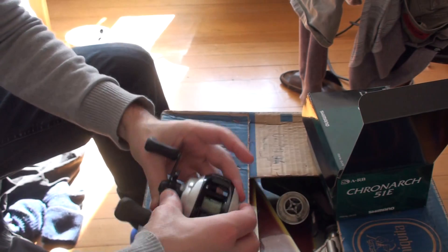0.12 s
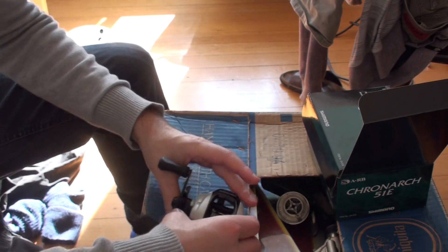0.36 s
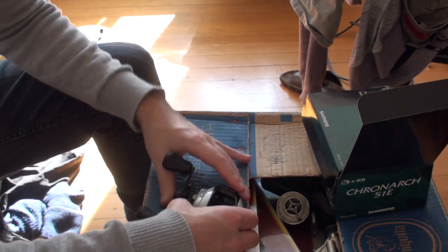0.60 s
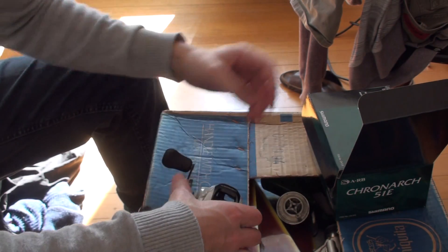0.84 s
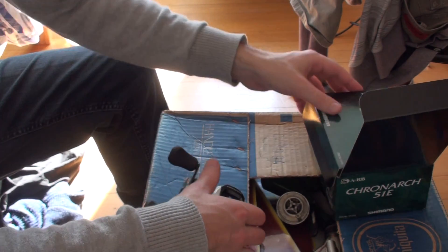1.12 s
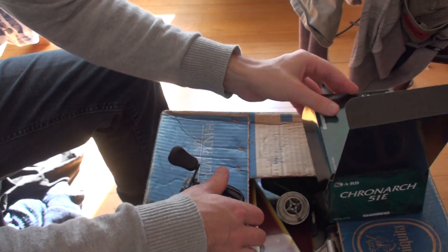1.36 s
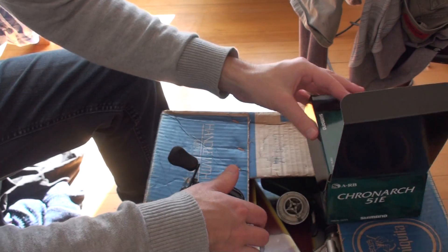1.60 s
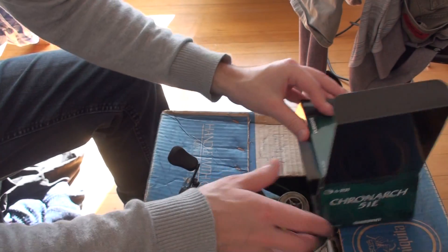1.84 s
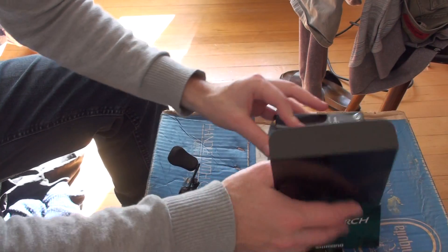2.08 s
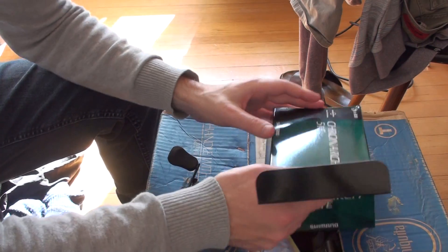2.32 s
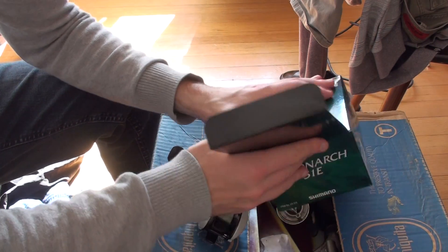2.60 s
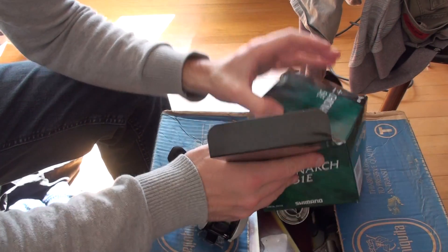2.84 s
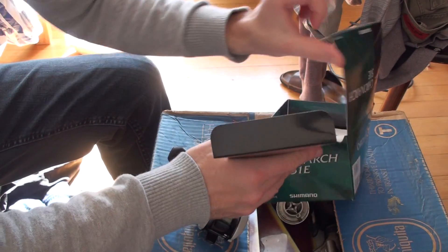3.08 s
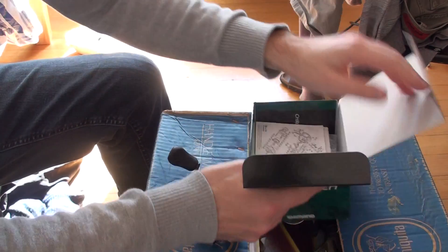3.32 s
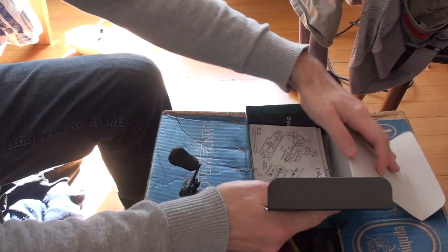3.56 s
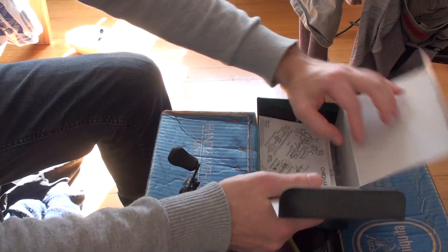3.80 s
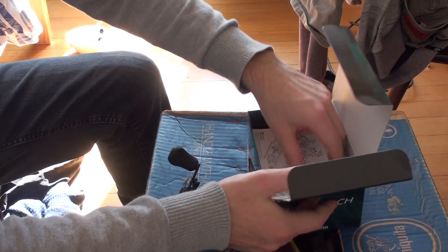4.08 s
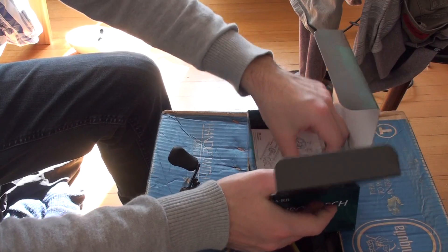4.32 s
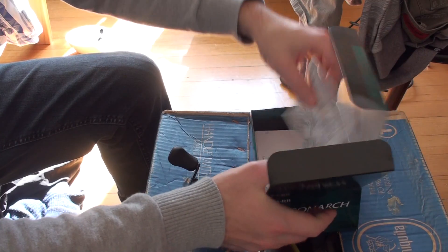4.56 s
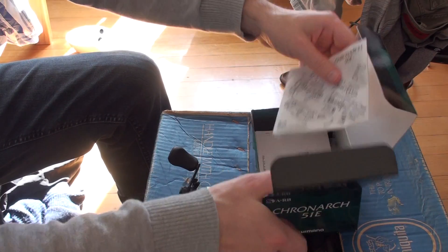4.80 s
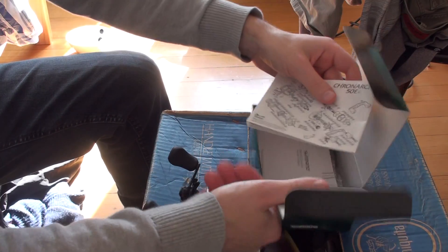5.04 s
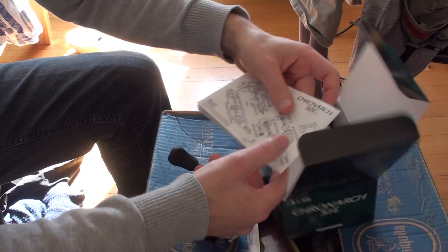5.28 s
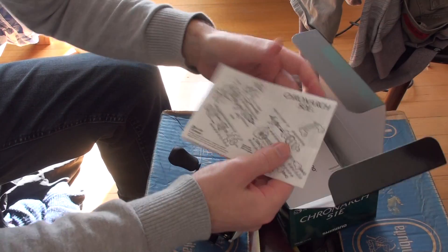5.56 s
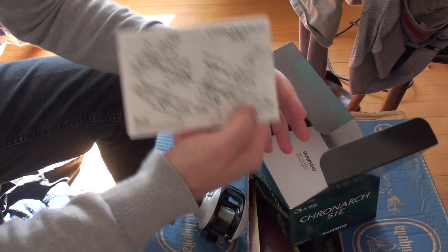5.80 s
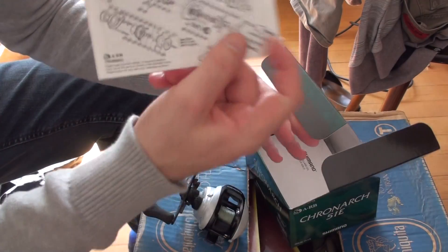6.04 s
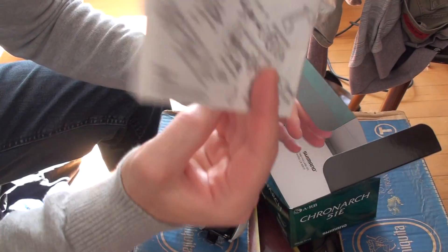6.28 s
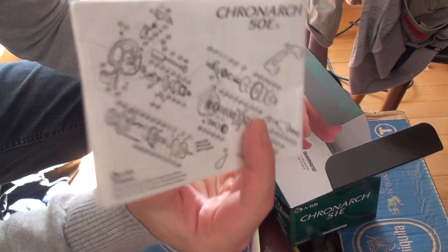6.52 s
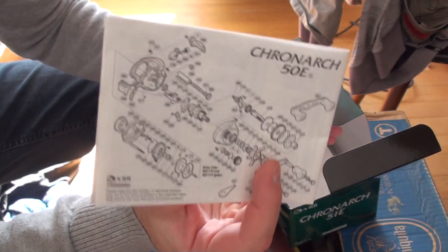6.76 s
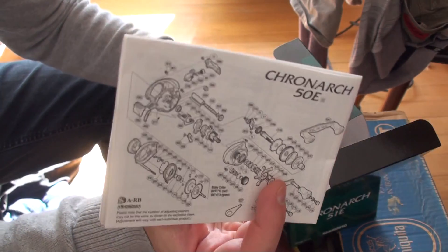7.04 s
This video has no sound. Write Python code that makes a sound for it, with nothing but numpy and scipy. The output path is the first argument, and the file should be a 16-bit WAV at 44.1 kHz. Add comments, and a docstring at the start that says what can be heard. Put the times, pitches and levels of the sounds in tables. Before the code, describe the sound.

Steady soft room air and a low rumble run throughout. A very faint metallic rattle comes at once; at 0.6 s a dull bump with a cardy knock, and at 0.75 s a brighter small metal rattle with a short scrape. From 1 to 3 s hands move a cardboard box: light scrapes, smooth fingertip hiss, small hollow knocks, a stronger drag near 2.1 s and another near 2.65 s. At 3.2 s a crisp bright snap and scrape, then knocks, and the loudest hollow thump at 3.6 s. Another knock lands at 4.13 s, a sharp scratch at 4.29 s, a tiny rising card squeak at 4.58 s amid paper rustle, and a higher clack at 4.97 s. Small scrapes and ticks continue to 5.5 s, then thin to faint hisses and isolated ticks. Soft, deep footfalls push the wooden floor around 5.35, 6.0, 6.55 and 7.1 s. Close stereo microphones, short room tail.

```python
"""Room air and a low rumble, and at once the faint rattle of a small metal reel set down close by.
Hands lift, turn and open a cardboard box and draw a folded sheet from it: noise drives the ringing panels
for scrapes and is filtered for rustle and smooth hiss; scattered contacts make knocks, snaps and ticks.
A card edge squeaks once, and near the end someone's steps push the wooden floor. The camera's
microphone pair is close to the hands; a diffuse tail gives the room."""
import sys
import numpy as np
from scipy import signal
from scipy.fft import rfft, irfft, next_fast_len
from scipy.io import wavfile
from scipy.ndimage import uniform_filter1d

SR = 44100
rng = np.random.default_rng(int(sys.argv[2]) if len(sys.argv) > 2 else 0)


def volts(x):
    """Linear amplitude factor 10**(x/20) for a level x in dB, scalar or array-like."""
    e = np.asarray(x, float) / 20
    return 10 ** e


def generate_wav(sig):
    """Save sig (samples, or channels by samples) to the path in sys.argv[1] as 16-bit PCM at SR."""
    pcm = np.round(np.clip(np.atleast_2d(sig).T, -1, 1) * 32767).astype(np.int16)
    wavfile.write(sys.argv[1], SR, pcm)


N = 315443
T = np.arange(N) / SR  # seconds

# Spectrum of the room's air. Each row: frequency in Hz, relative density in dB.
AIR_SPECTRUM = [(35, -25), (60, -6), (124, -10), (393, -7), (497, -8), (629, -9), (916, -8.5), (1210, -6),
                (1650, -12), (2090, -14), (10800, -33), (13000, -25), (16500, -28)]
# Low rumble of the room, set by hand at a few times. Each row: time in seconds, rms level of the mid in dB.
RUMBLE_LEVEL = [(0.0, -71), (0.3, -79), (0.63, -65), (0.88, -71), (1.05, -66), (1.2, -75), (2.39, -69),
                (2.59, -68), (2.89, -72), (3.13, -70), (4.0, -67), (4.56, -76), (5.04, -67.5),
                (6.11, -70.5), (7.15, -63.5)]
# Spread of the microphone pair. Each row: frequency in Hz, gain given to the side signal in dB.
PAIR_WIDTH = [(30, -24), (110, -18), (400, -11), (1300, -10.5), (4400, -8.5), (8000, -8), (11000, -5),
              (12500, -35)]
# Near sources a little to the right. Each row: frequency in Hz, right over left in dB.
RIGHT_LEAN = [(500, 0), (1500, 1.5), (9000, 2), (13000, 1.5)]
# Decay of the room. Each row: band centre in Hz, t60 in seconds.
ROOM_DECAY = [(150, 0.26), (400, 0.23), (1000, 0.28), (2500, 0.31), (6000, 0.35), (13000, 0.25)]

# Strokes that drag on card. Each row: peak time in seconds, scrape level in dB, rise in seconds,
# fall in seconds, paper rustle against the scrape in dB.
SCRAPE_STROKES = [(.1, -73, 0.0076, 0.082, 5), (.66, -67, .15, .04, -3), (.756, -46.5, 0.0073, 0.021, -26),
                  (1.056, -54.5, 0.0047, 0.019, -17), (1.17, -65.5, 0.088, 0.22, -13),
                  (1.4, -67.5, 0.41, .12, -4.5), (1.7, -65.5, 0.11, 0.088, -6.5),
                  (1.88, -60.5, .07, 0.078, -11), (1.984, -64.5, 0.022, .1, -19),
                  (2.108, -51.5, .1, 0.019, -9.5), (2.172, -56.5, .02, 0.1, -9),
                  (2.434, -67, 0.32, 0.26, -4), (2.568, -65, 0.15, .2, -15),
                  (2.666, -51.5, 0.21, 0.021, -10), (2.798, -62.5, 0.15, 0.22, -4),
                  (3.02, -61.5, 0.1, 0.31, -8), (3.17, -67, 0.35, .1, -20), (3.23, -43, .03, 0.094, -8),
                  (3.36, -51, 0.14, 0.15, -7), (3.5, -56.5, 0.29, 0.015, -8), (3.528, -59, 0.016, 0.2, -15),
                  (3.72, -57, .3, 0.25, -12), (3.81, -61.5, 0.23, 0.07, -6),
                  (3.938, -47.5, .025, 0.013, -13), (3.978, -59.5, .03, 0.083, -7.5),
                  (4.22, -55, 0.094, 0.033, -4), (4.288, -42.5, 0.016, 0.0038, -15),
                  (4.418, -53, 0.11, 0.1, -6.5), (4.588, -64, .02, 0.041, -9),
                  (4.654, -59, 0.0052, 0.11, 2), (4.892, -65.5, 0.29, 0.042, 1),
                  (5.05, -53.5, 0.073, 0.029, -13), (5.08, -62.5, .05, 0.13, 0.5),
                  (5.272, -56.5, 0.075, 0.035, -11), (5.39, -57.5, 0.49, .1, -15),
                  (5.438, -56, 0.084, 0.089, -8), (5.6, -68, .1, 0.046, -13),
                  (5.852, -67.5, 0.22, .02, -17), (6.0, -68, .1, 0.38, -8), (6.21, -81, .02, 0.15, -3),
                  (6.29, -70, 0.044, .015, -1), (6.46, -66.5, 0.049, .09, -17),
                  (6.62, -68, 0.015, 0.06, -0.5), (7.05, -72.5, 0.69, .02, -7.5),
                  (7.14, -67, 0.061, .1, -9)]
# Smooth hisses: fingertips sliding over smooth faces, but at .764 s the bright rattle of the metal reel.
# Each row: peak time in seconds, hiss level in dB, rise in seconds, fall in seconds,
# finest hiss against the hiss in dB.
HISS_STROKES = [(.7, -66.5, 0.11, 0.16, 1), (.764, -55.5, 0.029, 0.037, -3),
                (1.174, -71.5, 0.045, 0.12, -9), (1.47, -69.5, 0.11, .09, -11),
                (1.674, -69.5, 0.1, 0.12, -11), (1.792, -69.5, .2, 0.13, -11), (1.9, -64.5, 0.043, .2, -12),
                (1.962, -59, 0.1, 0.28, -7.5), (2.12, -66.5, .3, 0.33, -6.5), (2.568, -69, 0.32, .4, -8),
                (2.77, -65, .3, 0.051, -12), (2.908, -65, 0.039, 0.13, -14), (3.08, -70.5, .05, 0.21, -15),
                (3.36, -58, 0.11, 0.092, -21), (3.515, -59.5, 0.12, 0.13, -6.5),
                (3.81, -66, 0.11, 0.43, -6), (3.938, -60.5, .05, .04, -12), (3.978, -57.5, .03, 0.05, -13),
                (4.342, -65.5, 0.063, .5, -5), (4.432, -59.5, 0.02, 0.32, -9),
                (4.588, -58.5, 0.071, 0.031, -8), (4.654, -62.5, .01, 0.16, -22),
                (4.892, -55, 0.095, 0.029, -8), (5.05, -62.5, 0.23, 0.21, -18),
                (5.292, -58.5, 0.11, 0.13, -5.5), (5.438, -66.5, .055, 0.18, -14),
                (5.536, -66.5, 0.15, 0.084, -4.5), (5.702, -67, 0.12, 0.05, -6.5),
                (5.772, -64.5, 0.022, 0.089, -3.5), (5.946, -63, 0.093, .08, -4.5),
                (6.11, -67.5, .004, 0.16, -2), (6.2, -64, 0.071, 0.078, -8), (6.4, -68.5, .06, 0.078, -21),
                (6.46, -69.5, .1, 0.05, -10), (6.622, -61.5, 0.0066, 0.033, -9)]
# Hands never quite still. In order: resting scrape, rustle, hiss and finest hiss, each in dB.
REST_LEVELS = (-96, -81, -79.5, -85)
# Spectrum of rustling paper. Each row: frequency in Hz, relative density in dB.
RUSTLE_SPECTRUM = [(800, -29), (1500, 8), (2500, 4.5), (4000, -2), (6000, -7.5), (10000, -13)]
# Spectrum of the hiss. Each row: frequency in Hz, relative density in dB.
HISS_SPECTRUM = [(3000, -1), (5000, 1), (7000, 1.5), (9000, -2), (12000, -34)]
# Spectrum of the finest hiss. Each row: frequency in Hz, relative density in dB.
FINE_SPECTRUM = [(7000, -17), (10000, 1), (12000, 1), (16500, -12)]

# Rattles of the reel. Each row: start in seconds, peak level in dB.
REEL_RATTLES = [(.016, -58), (.760, -43)]
# Ringing metal of the reel. Each row: frequency in Hz, relative level in dB, t60 in seconds.
REEL_MODES = [(2400, -5, .02), (4064, -7, .03), (4700, -7, .05), (5250, -4, .05), (5420, -4, .07),
              (5600, -3, .06), (5780, -6, .04), (6000, -8, .03), (7004, -12, .02), (8300, -11, .03),
              (9700, -9, .05), (9830, -4, .075), (11420, -10, .03)]
# Short bright ticks, several of them the sharp top of a knock at the same moment.
# Each row: start in seconds, peak level in dB, centre in Hz, decay in milliseconds.
TICKS = [(.1118, -40, 2980, 2.9), (.745, -45, 4860, 1.7), (.745, -42, 11600, 4), (1.973, -46, 8000, 2.2),
         (2.066, -46, 8050, 3), (3.192, -21, 6960, 5), (3.204, -31.5, 10600, 1.9),
         (3.334, -32.5, 7000, 3.6), (3.446, -47, 4130, 2.6), (3.462, -41, 6000, 2.5), (3.509, -46, 8000, 3),
         (3.597, -32, 3640, 2.5), (3.791, -53, 3440, 1.1), (4.286, -37, 3240, 1.3),
         (4.406, -38.5, 4650, 1.4), (4.427, -55, 8000, 3), (4.579, -42, 7960, 4), (5.104, -47, 7000, 1.5),
         (5.291, -38, 11000, 4), (5.308, -39, 8200, 2), (5.358, -49, 8000, 3.5), (6.111, -43.5, 9940, 9),
         (6.211, -48, 11000, 4.6), (6.472, -43.5, 3600, 1.5), (6.472, -41.5, 6000, 1.2),
         (6.526, -43.5, 1590, 0.71), (6.621, -48.5, 4570, 8)]
# Knocks on card. Each row: start in seconds, body peak in dB, centre of the struck panel in Hz,
# gain of the far panels in dB, edge crack peak in dB.
KNOCKS = [(0.486, -46.5, 289, -18, -56), (0.5709, -47, 310, -17, -62), (0.6053, -30.5, 360, -2, -39.5),
          (0.7281, -44.5, 326, -12, -49.5), (0.7551, -41.5, 464, -23, -45), (1.0562, -48, 517, 0, -67),
          (1.1132, -50, 318, -15, -67), (1.2979, -55, 580, -4, -58), (1.4678, -58, 750, 10, -55),
          (1.974, -46, 293, -14, -63), (2.0659, -60, 820, 4, -46), (2.0972, -54, 790, 6, -55),
          (2.1626, -40.5, 640, 22, -44), (2.4421, -50, 540, -12, -52), (2.6112, -46, 590, -3, -45.5),
          (2.657, -43, 630, -15, -43.5), (2.8712, -43, 600, -14, -49), (3.0329, -49, 715, -3, -63),
          (3.1906, -23, 705, -4, -20), (3.2899, -32, 695, -2, -29), (3.3329, -39, 650, -7, -36),
          (3.5088, -42.5, 296, -17, -58), (3.5907, -19, 296, -5, -33.5), (3.5958, -13.5, 420, -8, -28.5),
          (3.9291, -40.5, 470, -9, -57), (4.1305, -26.5, 420, 27, -29.5), (4.2847, -35, 726, 4, -38.5),
          (4.404, -54, 920, -7, -39), (4.4268, -40, 540, -17, -58), (4.5793, -45, 730, -13, -41.5),
          (4.6246, -46, 454, -6, -61), (4.6563, -40.5, 1000, -1, -39), (4.691, -46, 650, 3, -53),
          (4.762, -47.5, 533, -12, -46.5), (4.9728, -29, 1490, -9.5, -31.5), (5.3578, -47, 520, -25, -52),
          (5.4768, -44.5, 590, -19, -54), (5.8277, -62, 370, 10, -59)]
# Panels of the box. Each row: usual frequency in Hz, level in dB ahead of each blow's own share, t60 in seconds.
BOX_MODES = [(206, -14, 0.024), (262, -1.5, 0.051), (310, 0.5, 0.051), (361.6, 1, 0.053), (414, 4, 0.028),
             (547, -0.5, 0.051), (620.4, 4, 0.054), (742.5, 7.5, 0.018), (790, -0.5, 0.067),
             (842, 0, 0.035), (983, 5.5, 0.014), (1173, 4.5, 0.021), (1345, 3, 0.015), (1648, -3, 0.0193),
             (2130, -23, 0.057)]
# Dull bumps through the table top. Each row: start in seconds, peak in dB, extra gain of the lowest mode in dB.
BUMPS = [(0.608, -40, 10), (0.757, -56, 12), (1.977, -46, -12), (2.168, -56, 26), (3.196, -40, 5.5),
         (3.292, -34.5, 4.5), (3.512, -45, 7), (3.599, -47, 2), (3.937, -45, 0), (4.131, -44, 1.5),
         (4.288, -56, 1), (4.428, -42.5, -4), (4.639, -49, -10), (5.831, -55, 1), (6.469, -58, -10)]
# Table top. Each row: frequency in Hz, level in dB ahead of each blow's own gain, t60 in seconds.
TABLE_MODES = [(91.7, -4.5, 0.093), (146.4, -2.5, 0.17), (224.4, 1.5, 0.13)]
# Card edge dragging on card. One row: start in seconds, length in seconds, pitch at the start in Hz,
# pitch at the end in Hz, peak in dB.
SQUEAK = (4.580, .045, 700, 830, -45)
# Steps on the floor. Each row: start in seconds, peak in dB, extra gain of the highest mode in dB.
STEPS = [(5.348, -49, 4), (5.974, -43, -8), (6.561, -40.5, -6), (7.079, -50.5, 9)]
# Floorboards. Each row: frequency in Hz, level in dB ahead of each step's own gain, t60 in seconds.
BOARD_MODES = [(42.15, 1.5, 0.79), (49.95, 5.5, 0.46), (90, 2, 0.45)]


def colour(x, points):
    """Shape the spectrum by (Hz, dB) points, joined by lines over log frequency."""
    hz, db = np.transpose(points)
    size = next_fast_len(x.shape[-1])
    f = np.arange(size // 2 + 1) * SR / size + 1
    gain = volts(np.interp(np.log(f), np.log(hz), db))
    return irfft(rfft(x, size) * gain, size)[..., :x.shape[-1]]


def unit(x):
    """Scale to rms 1."""
    return x / np.sqrt(np.mean(x ** 2))


def ring(modes, gain, length):
    """Decaying sines of a table of modes, each with an extra gain, for length seconds."""
    hz, db, t60 = np.transpose(modes)[:, :, None]
    t = T[:int(length * SR)]
    decay = np.exp(-np.log(1000) * t / t60)
    return np.sum(np.reshape(gain, (-1, 1)) * volts(db) * decay * np.sin(2 * np.pi * hz * t), axis=0)


def add(out, s, sound, peak_db):
    """Mix a sound in at time s with the given peak."""
    i = int(s * SR)
    sound = (sound * volts(peak_db) / np.abs(sound).max())[:N - i]
    out[i:i + len(sound)] += sound


def grains(spread_db):
    """Dense micro-slips: noise whose samples have a long-tailed size."""
    return rng.standard_normal(N) * volts(spread_db * rng.exponential(size=N))


def strokes(rows, rest_db):
    """Two gains over time: every stroke climbs to its peak and falls away; powers add over a resting level."""
    drop_db = 15  # a stroke's rise and fall span this much
    power = volts(np.reshape(rest_db, (2, 1))) ** 2 * np.ones(N)
    for s, db, rise, fall, other_db in rows:
        away = np.where(T < s, (s - T) / max(rise, .002), (T - s) / max(fall, .002))
        both = np.array([[1], [volts(other_db) ** 2]])
        power = power + volts(db - drop_db * away) ** 2 * both
    return np.sqrt(power)


def clatter(ms, first):
    """One firm first contact, then a scatter of lighter ones dying over a few ms."""
    ms = max(ms, .3)
    x = rng.standard_normal(2048) * np.exp(-T[:2048] * 1000 / ms)
    x[0] = first * np.sqrt(ms * SR / 2000)
    return x


def burst(lo_hz, hi_hz, ms, first):
    """A clatter heard through one band with steep edges."""
    band = signal.butter(3, [lo_hz, min(hi_hz, 18000)], "band", fs=SR, output="sos")
    return signal.sosfilt(band, clatter(ms, first))


def spread(mid, side):
    """Close microphone pair: the side signal grows with pitch, up to the high treble."""
    return mid + colour(side, PAIR_WIDTH) * np.array([[1], [-1]])


def room_air():
    """Steady air of the place: coloured noise, wide across the pair."""
    mid, side = colour(rng.standard_normal((2, N)), AIR_SPECTRUM)
    return volts(-67.5) * spread(mid, volts(11) * side) / np.std(mid)


def room_rumble():
    """Low rumble of the room: noise through one deep resonance, its level drawn between set times."""
    resonance = ring([(39.4, 0, 0.297)], 1, .7)  # Hz, dB, t60 s
    mid, side = unit(signal.fftconvolve(rng.standard_normal((2, N)), resonance[None])[:, :N])
    rumble = mid + volts(-27) * side * np.array([[1], [-1]])
    return rumble * volts(np.interp(T, *np.transpose(RUMBLE_LEVEL)))


def card_scrape():
    """Slips under the hands excite the ringing box panels and the table top."""
    card, _ = strokes(SCRAPE_STROKES, REST_LEVELS[:2])
    panel_hz = 640  # the panel under the hand
    octaves = np.log2(np.array(BOX_MODES)[:, 0] / panel_hz)
    share = 1 + 1.06 / (1 + (octaves / 0.009) ** 2)
    signs = (-1) ** np.arange(len(BOX_MODES))
    panels = ring(BOX_MODES, share * signs, .15)
    panels = panels + volts(-6) * ring(TABLE_MODES, [.3, -1, 1], .15)
    return signal.fftconvolve(card * unit(grains(4.0)), panels / np.linalg.norm(panels))[:N]


def smooth_hiss():
    """Fine grains in two treble bands: skin slipping over smooth faces, and once the reel's bright rattle."""
    main, fine = strokes(HISS_STROKES, REST_LEVELS[2:])
    hiss = main * unit(colour(grains(1.6), HISS_SPECTRUM))
    return hiss + fine * unit(colour(grains(2.2), FINE_SPECTRUM))


def paper_rustle():
    """The sheet rustles with the same strokes as the card: grains through a broad middle band."""
    _, sheet = strokes(SCRAPE_STROKES, REST_LEVELS[:2])
    return sheet * unit(colour(grains(2.6), RUSTLE_SPECTRUM))


def room(x):
    """Diffuse tail, each band dying at its own rate; the side hears a separate tail."""
    t, tail = T[:int(.5 * SR)], 0
    for hz, t60 in ROOM_DECAY:
        shape = [(hz / 11.0, -30), (hz / 1.3, -3), (hz, 0), (hz * 2.14, -3), (hz * 6.8, -30)]
        band = colour(rng.standard_normal((2, len(t))), shape)
        tail = tail + band * np.exp(-np.log(1000) * t / t60)
    tail = tail * np.minimum(t / 0.0029, 1)  # builds up over 2.9 ms
    mid, side = signal.fftconvolve(x[None], tail / np.linalg.norm(tail[0]))[:, :N]
    return spread(mid, volts(0.5) * side)


def reel_rattles():
    """The reel's metal rattles and rings: a short clatter excites its modes."""
    out = np.zeros(N)
    for s, db in REEL_RATTLES:
        add(out, s, signal.fftconvolve(clatter(3, 2.5), ring(REEL_MODES, 1, .2)), db)
    return out


def ticks():
    """Short bright ticks, alone or as the sharp top of a knock: a few ms of clatter around one pitch."""
    out = np.zeros(N)
    for s, db, hz, ms in TICKS:
        add(out, s, burst(hz / 1.57, hz * 1.21, ms, 1.4), db)
    return out


def knocks():
    """Each contact rings the struck panel and, by its own share, the rest of the box; the edge cracks and snaps."""
    out = np.zeros(N)
    panel_contact, edge_contact = 3.5, 1.2  # first contact against the clatter that follows
    signs = (-1) ** np.arange(len(BOX_MODES))
    for s, db, hz, far_db, crack_db in KNOCKS:
        ms = 4.0 + 3.8 * max(db + 30, 0)  # blows above -30 dB rattle longer
        held = np.array(BOX_MODES)
        held[:, 0] *= 1 + 0.04 * rng.standard_normal(len(held))  # every grip bends the panels a little
        octaves = np.log2(held[:, 0] / hz)
        share = volts(far_db) + 1 / (1 + (octaves / 0.32) ** 4)
        body = signal.fftconvolve(clatter(ms, panel_contact), ring(held, share * signs, 0.14))
        add(out, s, body, db)
        add(out, s, burst(1450, 4240, 1.1 * ms, edge_contact), crack_db)
        add(out, s, burst(5000, 11000, 1.5 * ms, edge_contact), crack_db - 8.5)  # bright snap
    return out


def table_bumps():
    """A soft 3.3 ms push rings the low modes of the table top."""
    out = np.zeros(N)
    push = np.hanning(int(0.0033 * SR))
    for s, db, lower_db in BUMPS:
        add(out, s, signal.fftconvolve(push, ring(TABLE_MODES, [volts(lower_db), -1, 1], 0.31)), db)
    return out


def squeak():
    """Stick-slip quickens while the edge slides: a short, rough rising tone with weak overtones, fading."""
    s, length, start_hz, end_hz, db = SQUEAK
    out, count = np.zeros(N), int(length * SR)
    pitch_wobble, level_wobble = uniform_filter1d(rng.standard_normal((2, count)), size=64)
    hz = np.linspace(start_hz, end_hz, count) * (1 + .25 * pitch_wobble)
    phase = 2 * np.pi * np.cumsum(hz) / SR
    tone = np.sin(phase) + .2 * np.sin(2 * phase) + .15 * np.sin(3 * phase)
    envelope = signal.windows.tukey(count, .3) * np.linspace(1, .5, count)
    add(out, s, tone * (1 + 2 * level_wobble) * envelope, db)
    return out


def steps():
    """Heels push the boards for 12 ms and their low modes ring on."""
    out = np.zeros(N)
    push = np.hanning(int(0.012 * SR))
    for s, db, upper_db in STEPS:
        add(out, s, signal.fftconvolve(push, ring(BOARD_MODES, [1, -1, volts(upper_db)], 0.85)), db)
    return out


def scene():
    """All near sources, a little to the right, their room tail, the rumble, the steps and the steady air."""
    scrape = card_scrape()
    hiss = smooth_hiss()
    rustle = paper_rustle()
    box = knocks() + table_bumps() + ticks() + reel_rattles() + squeak() + scrape + rustle
    # small panels radiate no deep bass
    box = signal.sosfilt(signal.butter(2, 75, "high", fs=SR, output="sos"), box)
    near = box + hiss
    air = room_air()
    # the fingertips face the camera, so the walls get less of the hiss
    walls = volts(-2) * room(box + volts(-15.5) * hiss)
    low = room_rumble() + steps()
    return np.array([near, colour(near, RIGHT_LEAN)]) + walls + low + air


def roll_off(x):
    """The treble ends steeply here."""
    return signal.sosfilt(signal.butter(12, 17880, fs=SR, output="sos"), x)


def record(dry):
    """The camera cuts the top steeply above 16.5 kHz."""
    top_cut = signal.ellip(8, .2, 60, 16500, fs=SR, output="sos")
    mix = signal.sosfilt(top_cut, dry)
    return roll_off(mix)


dry = scene()
out = record(dry)
generate_wav(out)
```